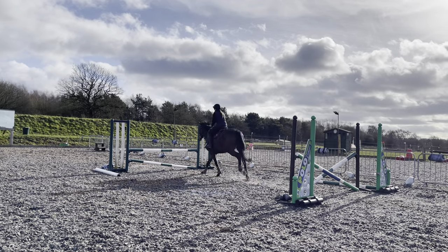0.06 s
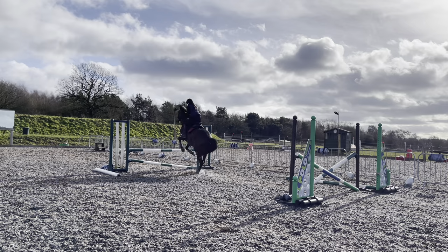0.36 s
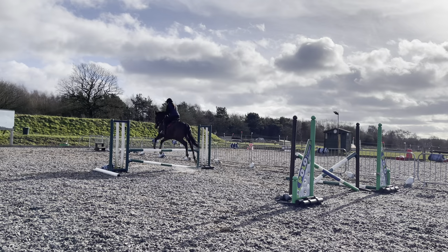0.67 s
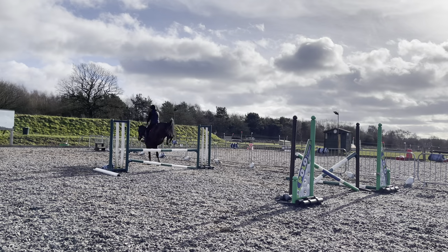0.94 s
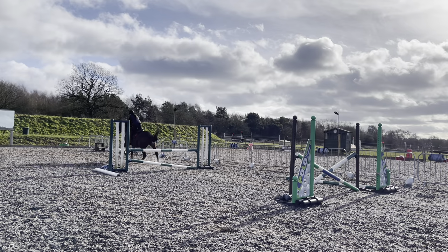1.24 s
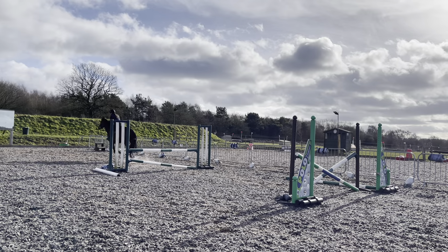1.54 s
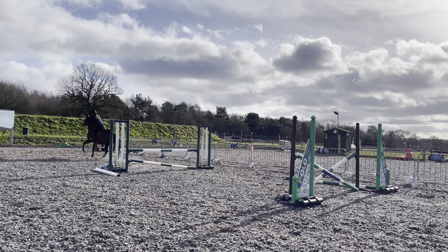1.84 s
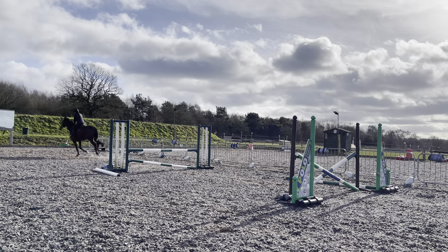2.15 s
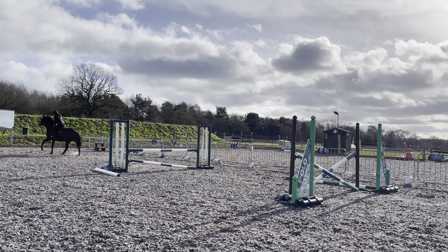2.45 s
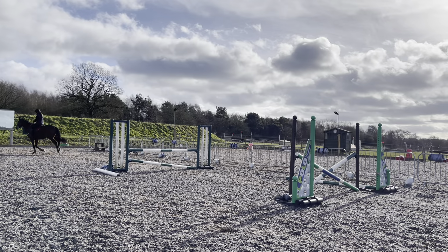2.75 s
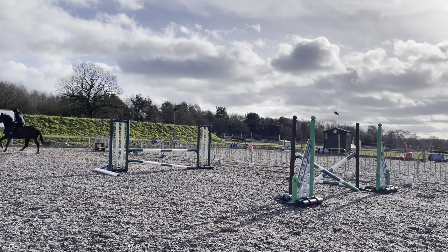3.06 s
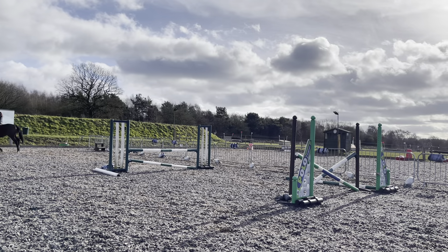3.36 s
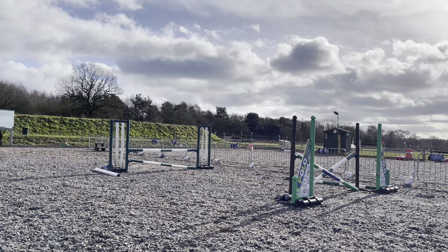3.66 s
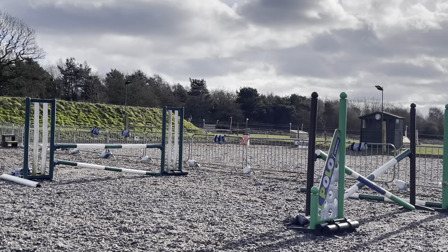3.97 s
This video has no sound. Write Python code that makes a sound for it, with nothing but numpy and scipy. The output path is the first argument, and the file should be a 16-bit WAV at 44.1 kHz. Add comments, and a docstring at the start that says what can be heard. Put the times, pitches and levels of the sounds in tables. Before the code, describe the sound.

A horse jumps a fence in an outdoor gravel arena, its hoof knocking sharply on a wooden pole and throwing grit. Faint hoofbeats, scuffs and tack clicks follow as it canters off, while wind buffets the microphone throughout.

```python
"""A horse jumping in the wind

A horse clears a fence in a gravel arena and canters off. At take-off a hoof strikes the wooden pole,
exciting its modes, and throws grit; tack clicks, and later hoofbeats are faint taps and scuffs.
Turbulent pressure on the microphone makes a rumble and low buffets. Behind lies a distant outdoor
wash with one bird chirp; the upper part of the wash drops away just before the end."""
import sys
import numpy as np
from scipy import signal
from scipy.fft import rfft, irfft
from scipy.io import wavfile

SR = 44100
rng = np.random.default_rng(int(sys.argv[2]) if len(sys.argv) > 2 else 0)


def file_out(sig):
    """Save sig as 16-bit WAV at sys.argv[1]."""
    # one column per channel
    cols = np.atleast_2d(sig).T
    # limit, then scale
    lim = np.clip(cols, -1, 1)
    pcm = np.round(lim * 32767).astype(np.int16)
    wavfile.write(sys.argv[1], SR, pcm)


N = 176400

# Coherence of the two microphone ports. Each row: frequency in Hz, coherence from 0 to 1.
PORT_COHERENCE = [(300, 1), (800, 0.23), (9500, 0.19)]
# Phase between the ports. Each row: frequency in Hz, lead of the left in radians.
PORT_PHASE = [(450, -0.5), (800, -3.5), (3000, 2), (8300, 8.5)]

# Envelopes of the distant wash, gravel hiss and wind rumble. Each row: time in seconds, level in dB.
WASH_ENVELOPE = [(0, -47), (1.15, -48), (3.81, -49), (3.835, -64)]
HISS_ENVELOPE = [(0, -61), (.6, -70.5), (.85, -67.5), (1.3, -64.5), (2.3, -78), (3.8, -75.5), (3.84, -100)]
RUMBLE_ENVELOPE = [(0, -42), (.66, -30), (.95, -41), (1.47, -39), (1.66, -35), (2.3, -37), (2.62, -27),
                   (2.86, -42.5)]
# Spectra of the wash, its low part, gravel and rumble. Each row: frequency in Hz, relative level in dB.
WASH_SPECTRUM = [(100, -15.5), (400, 2), (1050, 3), (1600, -6.5), (3100, -24.5), (12000, -52.5)]
LOW_WASH_SPECTRUM = [(60, -14.5), (370, 3), (800, -17.5), (5000, -52.5)]
GRAVEL_SPECTRUM = [(800, 0.5), (2500, 1.5), (8300, -15), (10300, -15), (13000, -29)]
RUMBLE_SPECTRUM = [(20, -27), (56, 2.5), (85, 1), (400, -23.5), (5000, -90)]
# The bird's note. One row: start in seconds, length in seconds, starting pitch in Hz, level in dB.
CHIRP = (3.752, .04, 5930, -77)

# Wind buffets. Each row: start in seconds, length in seconds, base level in dB, flutter offset in dB.
BUFFETS = [(0.0, 0.052, -35.5, -10), (0.184, 0.055, -33.5, -8), (0.27, 0.012, -30, -15),
           (0.332, 0.093, -38.5, -8), (0.446, 0.1, -34, -4.5), (0.562, 0.087, -27, -7.5),
           (0.645, 0.14, -41, -12), (1.034, 0.063, -34, -29.5), (1.154, 0.034, -34, -12),
           (1.236, 0.0065, -33.5, -7), (1.368, .058, -29.5, -7), (1.506, 0.12, -28, -3.5),
           (1.693, 0.089, -34, -4.5), (1.797, 0.064, -29.5, -12.5), (1.92, 0.015, -29, -19),
           (1.99, 0.023, -32.5, -2.5), (2.022, 0.041, -26.5, 2.5), (2.117, 0.0066, -31.5, -6),
           (2.172, 0.07, -31, -10), (2.319, 0.11, -36.5, -1.5), (2.442, 0.063, -33, -4),
           (2.554, 0.051, -28, -2.5), (2.641, 0.031, -36.5, -6), (2.688, 0.068, -27.5, -9),
           (2.815, 0.032, -39, -39), (2.979, 0.036, -36, -24), (3.229, 0.015, -28, -18)]
# Stereo spread of the eddies at full width. Each row: frequency in Hz, side relative to mid in dB.
WIND_SIDE = [(80, -17), (330, -11), (560, 2)]

# Light hoofbeats on gravel. Each entry: start in seconds.
TAP_TIMES = [0.115, 0.214, 0.678, 0.704, 0.745, 0.866, 1.712, 2.27, 3.084, 3.14, 3.295]
# Hooves scuffing gravel. Each row: centre in seconds, level in dB.
SCUFFS = [(.125, -61), (.2, -63), (1.07, -62), (1.43, -68), (1.545, -64), (2.685, -67), (3.34, -68)]
# Thrown grit. Each row: start in seconds, level in dB, 60 dB decay in seconds, tilt in dB per octave.
SPRAYS = [(0.376, -44.5, 0.087, 12.5), (0.464, -37, 0.24, 5.5), (.547, -51, 0.51, 3.5),
          (1.16, -55, 0.22, 7)]
# Clicks of tack and stones. Each row: start in seconds, level in dB, pitch in Hz.
CLICKS = [(.1225, -47, 4500), (.3705, -29, 9100), (1.1735, -38, 9000), (2.3785, -45, 5200),
          (2.7078, -46, 3800), (2.8395, -48, 4600), (3.188, -52, 6000)]
# Resonance of a click. Each row: frequency as a ratio to the pitch, relative level in dB.
CLICK_RESONANCE = [(.25, -20), (1, 0), (2.5, -22)]

# The hoof's blow on the pole and its rebounds. Each row: start in seconds, base level in dB, crack in dB.
KNOCKS = [(0.4586, -18.5, -17.5), (0.4749, -18.5, -32), (0.4842, -24.5, -37), (0.5468, -30, -30)]
# Modes of the wooden pole. Each row: frequency in Hz, relative level in dB.
POLE_MODES = [(743, -6.5), (902, 5.5), (1090, -2), (1213, 1), (1380, -2.5), (1477, -4), (2684, -10)]
# Spectra of an impact's thwack and crack. Each row: frequency in Hz, relative level in dB.
THWACK_SPECTRUM = [(200, -12.5), (1150, 9.5), (1550, 4), (2400, -9.5), (9000, -50.5)]
CRACK_SPECTRUM = [(2800, -12), (5000, 10.5), (6200, -3.5), (10300, -4.5), (13000, -21)]

BOOM_HZ, BODY_HZ, FLUTTER_HZ = (52.4, 97), (126, 256), (290, 460)
BOOM_DB, BODY_DB, FLUTTER_DB = -8.5, -6.5, -6.5  # offsets from a buffet's base level
EDDIES_PER_S, EDDY_SPREAD_DB = 450, 4
BUFFET_MARGIN_S, FULL_WIDTH_DB = 0.0098, -24
LOW_WASH_DB, RUMBLE_SIDE_DB, TAP_DB = -55.5, -31.5, -37
RING_DB, THWACK_DB = -17, -4  # offsets from a knock's base level
RING_T60_S, THWACK_T60_S, TAP_T60_S, CLICK_T60_S = .15, .034, .03, .008


def amp(db):
    """Amplitude ratio of a level in decibels."""
    return 10 ** (np.asarray(db) / 20)


def rms_normalised(x):
    """The signal scaled to a root mean square of one."""
    return x / np.sqrt(np.mean(x ** 2) + 1e-20)


def at_frequency(points, hz):
    """Interpolation on a logarithmic frequency axis."""
    frequencies, values = np.transpose(points)
    return np.interp(np.log(hz + 1), np.log(frequencies + 1), values)


def envelope(points):
    """Gain at every sample, interpolated in decibels."""
    return amp(np.interp(np.arange(N) / SR, *np.transpose(points)))


def decay(t, t60):
    """Exponential damping: 60 dB down after t60 seconds."""
    return np.exp(-np.log(1000) * t / t60)


def add(mix, start, sound):
    """Superposition of a sound on the mix, from a start in seconds."""
    part = mix[:, max(round(start * SR), 0):][:, :sound.shape[1]]
    part += sound[:, :part.shape[1]]


def pan(x, left_db):
    """A level difference between the ports places a sound to the left."""
    return x * amp([[left_db / 2], [-left_db / 2]])


def from_horse(x, left_db, lead_s=.0001):
    """Path difference: the horse is on the left, so its sound reaches that port first."""
    delayed = np.pad(x, (int(lead_s * SR), 0))[:len(x)]
    return pan(np.array([x, delayed]), left_db)


def noise(spectrum, size, tilt_db=0, grain_db=0):
    """Coloured noise, partly coherent between the ports; random level steps make it grainy."""
    hz = np.fft.rfftfreq(size, 1 / SR)
    grains = amp(grain_db * np.repeat(rng.standard_normal(size // 32 + 1), 32)[:size])
    left, independent = rfft(rng.standard_normal((2, size)) * grains)
    coherence = np.clip(at_frequency(PORT_COHERENCE, hz), 0, 1)
    right = coherence * left + np.sqrt(1 - coherence ** 2) * independent
    right *= np.exp(-1j * at_frequency(PORT_PHASE, hz))
    gain = amp(at_frequency(spectrum, hz) + tilt_db * np.log2(hz + 1))
    return rms_normalised(irfft(np.array([left, right]) * gain, size))


def burst(spectrum, t60, tilt_db=0):
    """An impact transient: mono noise that rises quickly to about unit level and decays exponentially."""
    t = np.arange(4096) / SR
    attack = 1 - np.exp(-(40 * t / t60) ** 2)
    fade = attack * decay(t, t60)
    transient = noise(spectrum, len(t), tilt_db)[0] * fade
    return rms_normalised(transient) * np.sqrt(np.mean(fade ** 2))


def arena():
    """Ambient noise adds in three bands: a distant wash, its steady low part and the hiss of gravel."""
    wash = envelope(WASH_ENVELOPE) * noise(WASH_SPECTRUM, N, grain_db=2.5)
    low_wash = amp(LOW_WASH_DB) * noise(LOW_WASH_SPECTRUM, N)
    hiss = envelope(HISS_ENVELOPE) * noise(GRAVEL_SPECTRUM, N, grain_db=3)
    return wash + low_wash + hiss


def bird(rise_hz_per_s=4000):
    """A linear chirp: one faint, rising pure tone under a half-sine envelope."""
    start, length, hz, db = CHIRP
    t = np.arange(N) / SR - start
    swell = np.sin(np.pi * np.clip(t / length, 0, 1))
    return amp(db) * swell * np.sin(2 * np.pi * (hz + rise_hz_per_s * t / 2) * t)


def wind_rumble():
    """Slow fluctuations of wind pressure act almost equally on both ports."""
    mid, side = (noise(RUMBLE_SPECTRUM, N)[0] for _ in range(2))
    return envelope(RUMBLE_ENVELOPE) * (mid + amp(RUMBLE_SIDE_DB) * np.array([side, -side]))


def eddies():
    """Turbulence as shot noise: random pressure kicks, one train common to the ports, one opposed."""
    strength = amp(EDDY_SPREAD_DB * np.minimum(rng.exponential(1, (2, N)), 4))
    sign = rng.choice([-1, 1], (2, N))
    return strength * sign * (rng.random((2, N)) < EDDIES_PER_S / SR)


def eddy_band(kicks, band_hz, order):
    """A frequency band holds one range of eddy sizes; small eddies differ more between the ports."""
    low, high = band_hz
    hz = np.fft.rfftfreq(N, 1 / SR) + 1
    mid_gain = 1 / np.sqrt((1 + (low / hz) ** (2 * order)) * (1 + (hz / high) ** (2 * order)))
    side_gain = mid_gain * amp(at_frequency(WIND_SIDE, hz))
    return irfft(rfft(kicks) * np.array([mid_gain, side_gain]), N)


def wind_buffets():
    """Turbulent pressure swells and dies as a boom, a body and a flutter; weak buffets are nearly mono."""
    kicks, out = eddies(), np.zeros((2, N))
    boom = eddy_band(kicks, BOOM_HZ, order=4)
    body = eddy_band(kicks, BODY_HZ, order=5)
    flutter = eddy_band(kicks, FLUTTER_HZ, order=5)
    for start, length, db, flutter_db in BUFFETS:
        first = max(int((start - BUFFET_MARGIN_S) * SR), 0)
        span = int((length + 2 * BUFFET_MARGIN_S) * SR)
        arch = np.sin(np.linspace(0, np.pi, span)).clip(0)
        width = amp(min(db - FULL_WIDTH_DB, 0))
        bands = [(boom, BOOM_DB - 0.29 * flutter_db, .6),  # more flutter, less boom
                 (body, BODY_DB, .9),
                 (flutter, FLUTTER_DB + flutter_db, 1.2)]
        for band, band_db, sharpness in bands:
            mid, side = band[:, first:first + span] * arch ** sharpness
            ports = np.array([mid + width * side, mid - width * side])
            add(out, first / SR, amp(db + band_db) * rms_normalised(ports))
    return out


def hoof_taps():
    """Distant hoofbeats are heavily damped impacts, short and dull, alike at both ports."""
    out = np.zeros((2, N))
    for start in TAP_TIMES:
        add(out, start, amp(TAP_DB) * burst(THWACK_SPECTRUM, TAP_T60_S, tilt_db=-4)[None])
    return out


def hoof_scuffs(length_s=.11):
    """Friction of hooves pushing through gravel gives short swells of grainy noise."""
    out = np.zeros((2, N))
    swell = np.sin(np.linspace(0, np.pi, int(length_s * SR)))
    for centre, db in SCUFFS:
        friction = noise(GRAVEL_SPECTRUM, len(swell), tilt_db=3, grain_db=5)
        add(out, centre - length_s / 2, amp(db) * swell * friction)
    return out


def grit_sprays(rise_s=.0036):
    """The many small impacts of thrown grit merge into bright noise that decays exponentially."""
    out, t = np.zeros((2, N)), np.arange(SR // 2) / SR
    for start, db, t60, tilt_db in SPRAYS:
        shape = np.minimum(t / rise_s, 1) * decay(np.maximum(t - rise_s, 0), t60)
        grit = noise(GRAVEL_SPECTRUM, len(t), tilt_db)
        add(out, start, pan(amp(db) * shape * grit, left_db=2.5))
    return out


def tack_and_stone_clicks():
    """Each hard contact excites a broad, quickly damped resonance at its own pitch."""
    out = np.zeros((2, N))
    for start, db, hz in CLICKS:
        spectrum = [(hz * ratio, relative_db) for ratio, relative_db in CLICK_RESONANCE]
        add(out, start, from_horse(amp(db) * burst(spectrum, CLICK_T60_S), left_db=2))
    return out


def pole_knocks():
    """Impact excitation: the struck pole rattles, each contact a crack, a thwack and a modal ring."""
    out, t = np.zeros((2, N)), np.arange(SR // 2) / SR
    for start, db, crack_db in KNOCKS:
        # The ring arrives diffusely, so each mode has a random phase at each port.
        modes = sum(amp(mode_db) * np.sin(2 * np.pi * (hz * t + rng.random((2, 1))))
                    for hz, mode_db in POLE_MODES)
        ring = amp(db + RING_DB) * modes * decay(t, RING_T60_S)
        thwack = amp(db + THWACK_DB) * burst(THWACK_SPECTRUM, THWACK_T60_S)
        crack = amp(crack_db) * burst(CRACK_SPECTRUM, CLICK_T60_S)
        add(out, start, pan(ring, left_db=6))
        add(out, start, from_horse(thwack + crack, left_db=7))
    return out


def scene():
    """Superposition of the wind, the surroundings and the horse."""
    background = wind_buffets() + wind_rumble() + arena() + bird()
    horse = pole_knocks() + tack_and_stone_clicks() + grit_sprays() + hoof_scuffs() + hoof_taps()
    return background + horse


def record(dry):
    """Band limiting: a linear-phase low-pass filter removes the highest treble."""
    cutoff_hz = 12900
    lowpass = signal.firwin(255, cutoff_hz, window=("kaiser", 8), fs=SR)
    return signal.oaconvolve(dry, lowpass[None], "same")


dry = scene()
out = record(dry)
file_out(out)
```